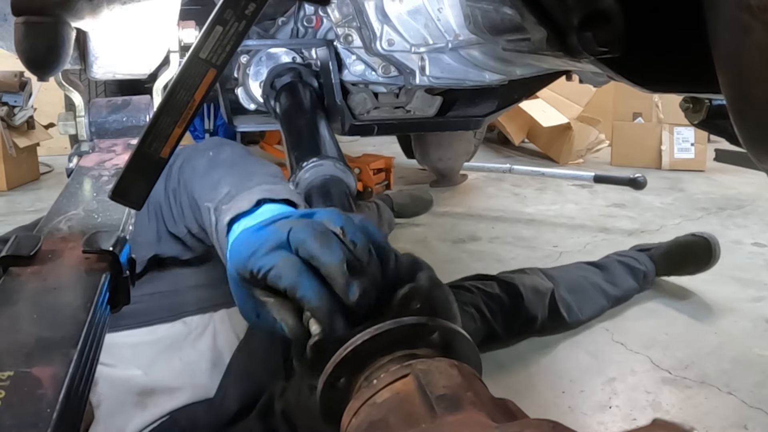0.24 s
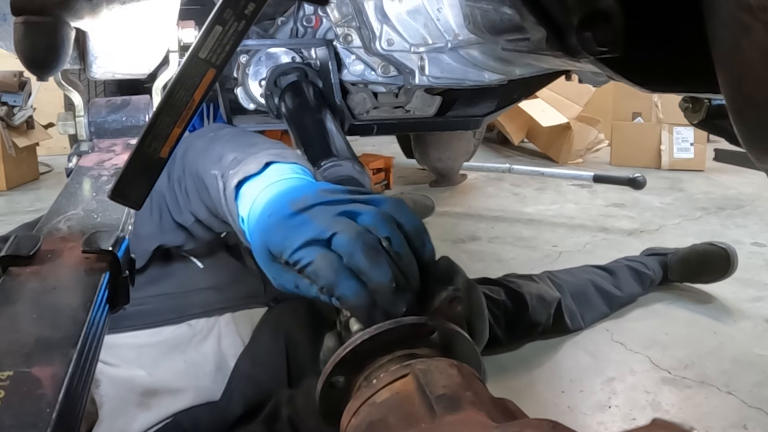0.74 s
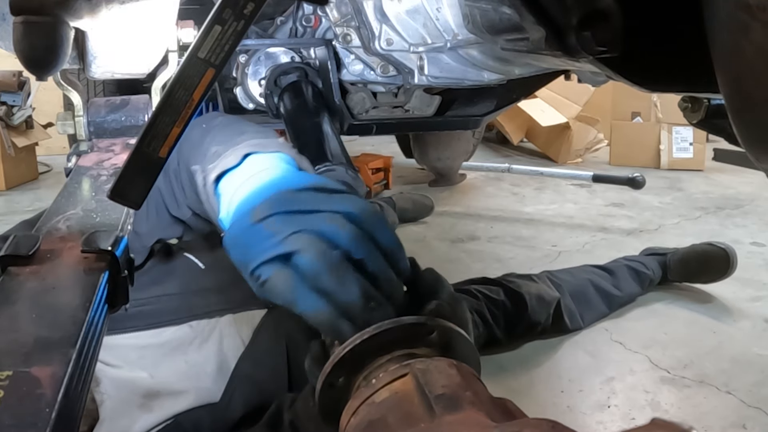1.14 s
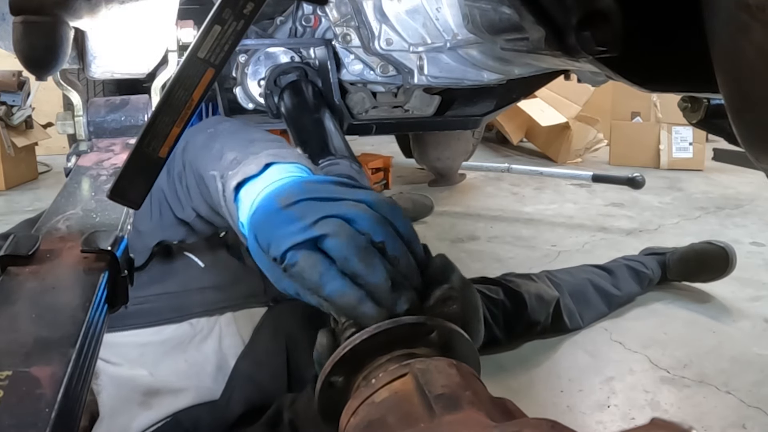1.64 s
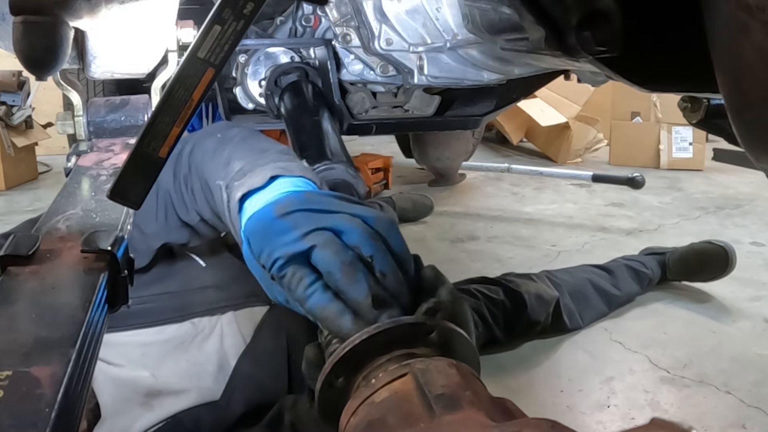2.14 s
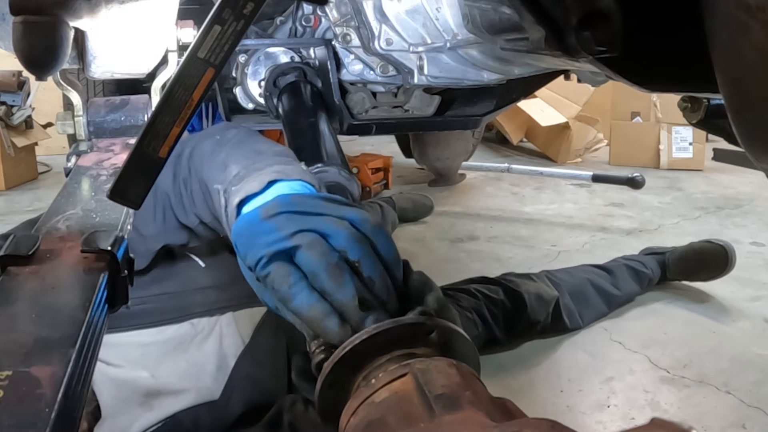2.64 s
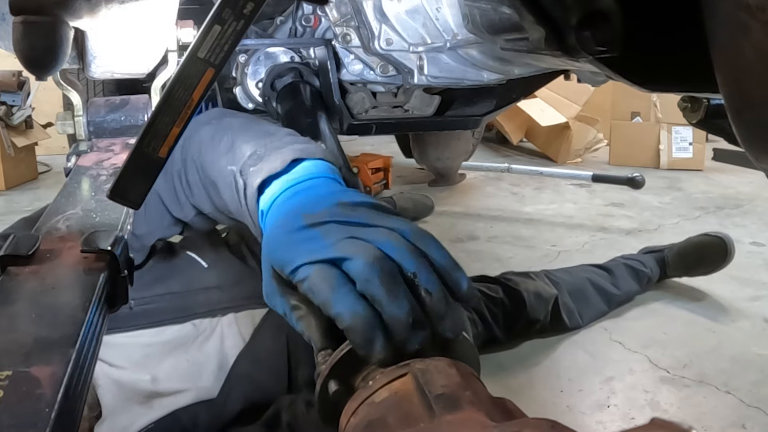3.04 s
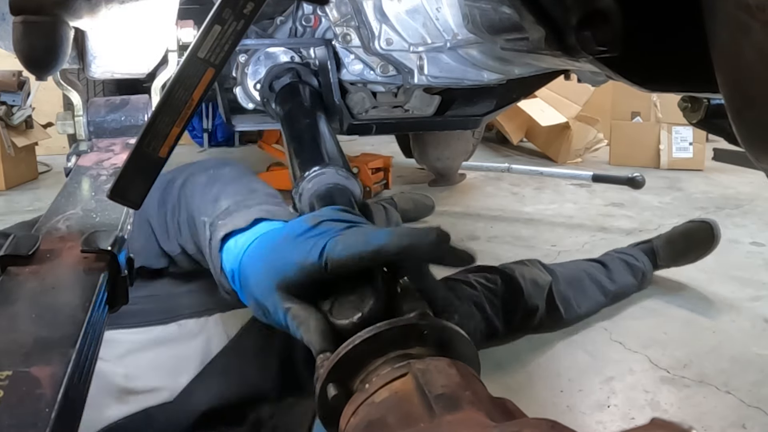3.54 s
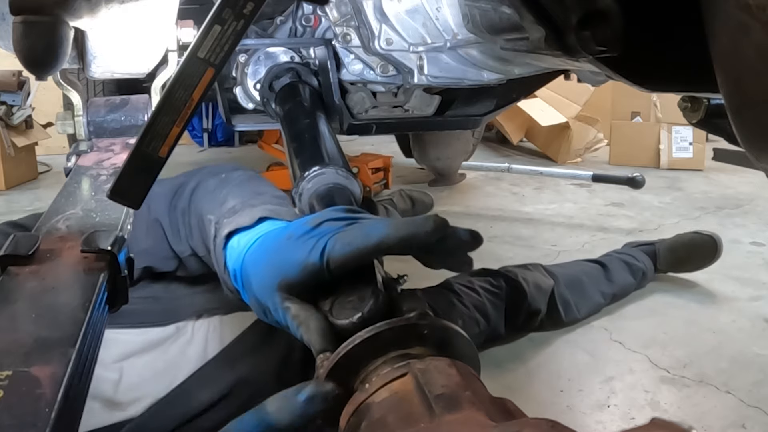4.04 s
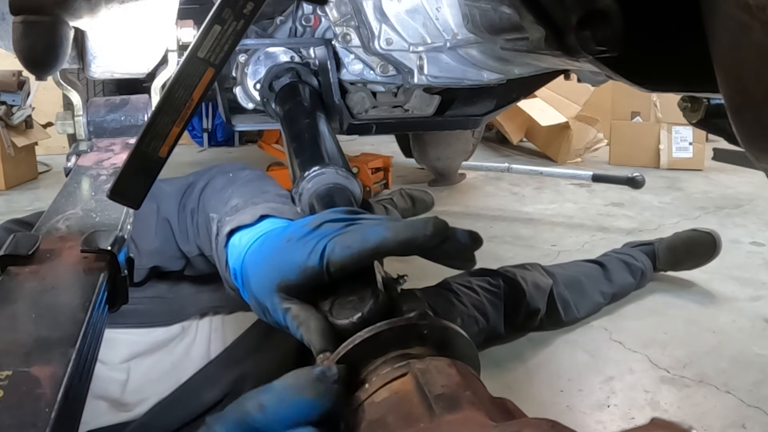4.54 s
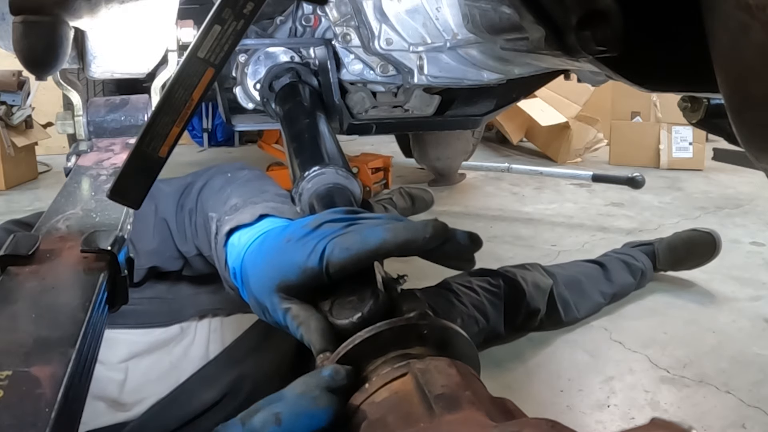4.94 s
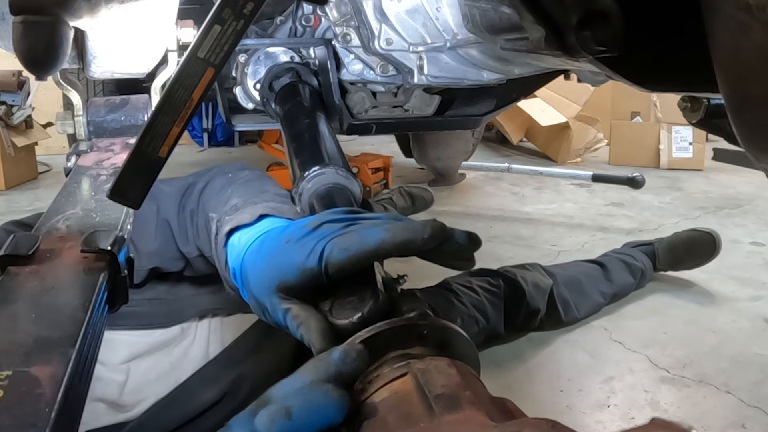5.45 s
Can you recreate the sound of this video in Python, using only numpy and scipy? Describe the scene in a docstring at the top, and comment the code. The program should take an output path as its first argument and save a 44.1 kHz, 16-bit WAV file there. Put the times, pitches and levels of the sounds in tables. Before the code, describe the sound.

A heavy metal clank with a hollow, ringing boom opens, as a driveshaft is pushed against a differential. Light bolt ticks, dull thuds and sharp clinks come at uneven intervals, building to another loud clatter about halfway. Afterwards the work turns quieter, with light clinks, brief gritty scrapes and glove scuffs. The microphone is close, over the faint low hum of a slightly echoing garage.

```python
"""Driveshaft flange against a differential

Under a car in a garage, a gloved hand works the two flanges together. The hollow shaft booms at
the start, the housing thuds, the steel flange clinks and scrapes, a loose bolt ticks. Struck parts
ring as decaying sines; noise bursts add the contact. Sleeve and glove rustle close to a small
microphone, over the quiet air of the garage."""
import sys
import numpy as np
from scipy import signal
from scipy.io import wavfile
from scipy.ndimage import uniform_filter1d

SR = 44100
rng = np.random.default_rng(int(sys.argv[2]) if len(sys.argv) > 2 else 0)


def generate_wav(sig):
    """Save sig (samples, or channels by samples) to the path in sys.argv[1] as 16-bit PCM at SR."""
    pcm = np.round(np.clip(np.atleast_2d(sig).T, -1, 1) * 32767).astype(np.int16)
    wavfile.write(sys.argv[1], SR, pcm)


N = 251348

# dull blows on the housing: start_s, level_db, centre_hz, t60_s, bite_db
HOUSING_THUDS = [(0.0, -22.5, 170, 0.43, -10), (.062, -7.5, 594, 0.12, -4), (.072, -12.5, 422, 0.067, -5),
                 (.079, -4, 308, 0.088, -15), (.087, -14, 448, 0.17, -5), (.104, -11, 675, 0.076, -7.5),
                 (.129, -14, 520, 0.21, -8), (.159, -18, 555, 0.46, -6), (1.064, -35, 302, 0.36, -25),
                 (1.362, -36.5, 292, .45, -4), (1.818, -21, 232, 0.069, -15), (1.845, -22, 466, .12, -7.5),
                 (1.94, -21, 227, 0.36, -17), (1.967, -24.5, 208, 0.13, -28), (2.343, -33, 338, 0.19, -21),
                 (2.498, -18.5, 367, 0.16, -9), (2.514, -25, 303, 0.24, -14),
                 (2.56, -26.5, 313, 0.086, -12), (2.689, -27, 292, .11, -10),
                 (2.828, -35.5, 587, 0.15, -24), (2.856, -20.5, 310, .22, -6),
                 (2.898, -20, 290, 0.65, -0.5), (2.925, -11.5, 550, 0.15, -8), (2.948, -7, 510, 0.083, -9),
                 (3.021, -29, 255, 0.21, -13), (3.058, -20, 272, 0.15, -16), (3.107, -21.5, 290, .19, -11),
                 (3.188, -17.5, 315, 0.073, -6), (3.374, -31.5, 290, 0.11, -17),
                 (3.673, -28.5, 660, 0.076, -32)]
# hard contacts: start_s, level_db, centre_hz, treble_fall_db_per_oct, ring_db
FLANGE_CLINKS = [(0.064, -8, 790, 11, -27), (.0716, -3, 1630, 19, -16), (0.0806, -4, 2240, 20, -33),
                 (1.8118, -12.5, 2780, 10.5, 1), (2.358, -32.5, 4000, 4, 1), (2.504, -24.5, 1830, 29, -4.5),
                 (2.563, -47, 1500, 20, -7), (2.8587, -23, 6040, 12, -10), (2.8959, -10.5, 3500, 10.5, 11),
                 (2.932, -11.5, 11000, 11, -29), (2.9472, -3, 2380, 26, -0.5),
                 (3.059, -29.5, 6000, 14, -17), (3.186, -27, 1810, 19, -1), (3.33, -30, 4440, 13, -25),
                 (3.519, -14, 8050, -5.5, -23), (3.539, -23, 3000, 10, -6), (3.689, -21.5, 2260, 21, -25),
                 (3.952, -19.5, 2980, 18, -23), (3.883, -24, 3970, 17, -21), (4.881, -18, 4300, 13, -26),
                 (4.936, -34, 2250, 24, -24), (5.034, -28.5, 4000, 9.5, 3), (5.156, -24, 4360, 13, 1),
                 (5.205, -21.5, 4460, 9.5, -10), (5.614, -23, 2260, 13.5, -15)]
BOLT_TICKS = [(.596, -32, 3500, 30, -16), (.679, -33.5, 2830, 13, -10), (1.0329, -22, 2500, 17, -38),
              (1.0461, -15, 2580, 22, -29), (1.05, -22, 3000, -2, -9), (1.064, -11, 2980, 19, -17),
              (1.258, -31.5, 4260, 11, -28), (1.3546, -20, 3470, 21, -10.5), (1.5288, -33, 2900, 19, -29)]
# blows that leave a part ringing freely: start_s, level_db
SHAFT_BLOWS = [(0.0, -23.5), (.066, -12), (1.066, -57), (1.36, -48), (1.82, -35), (2.35, -39)]
RIM_BLOWS = [(2.8587, -45), (2.8959, -22), (2.931, -32), (3.059, -61)]
SMALL_PART_BLOWS = [(4.935, -33), (5.204, -30), (5.604, -34), (5.613, -29.5)]
# flange faces sliding: start_s, swell_s, hold_s, level_db, grit_db, dulling_db_per_oct
FLANGE_SLIDES = [(2.003, 0.01, 0.1, -53, -20, 2.5), (2.196, 0.0074, .05, -50.5, -14, -4),
                 (2.25, 0.018, 0.026, -43.5, -25, 5.5), (2.295, 0.024, 0.049, -36, -19, 7),
                 (2.453, 0.027, 0.013, -38, -11.5, 3), (2.659, 0.013, 0.018, -44, -6.5, 3.5),
                 (2.8, 0.074, .015, -45, -18, 1), (3.038, 0.0039, .02, -47, -1, -1),
                 (4.545, 0.0072, 0.015, -31.5, -7, 35), (4.64, 0.01, 0.025, -40, 2.5, 23),
                 (4.659, 0.015, 0.027, -37.5, -0.5, 26), (4.834, 0.019, 0.035, -35.5, -3.5, 31),
                 (5.227, 0.019, 0.028, -45.5, -4, 8), (5.472, 0.053, 0.014, -43.5, -3, 8)]
# the first clank's rattling tail, then glove scuffs: middle_s, level_db, centre_hz, half_width_s
NOISE_SWELLS = [(0.199, -32, 2100, 0.099), (2.255, -46.5, 1400, 0.034), (2.342, -40.5, 1470, 0.043),
                (2.771, -42, 3900, .012), (3.464, -37, 3020, 0.031), (3.826, -34, 2600, 0.027),
                (3.983, -35.5, 2950, 0.055), (4.071, -40, 3660, 0.049), (4.458, -42.5, 3930, 0.055),
                (4.789, -46, 3780, 0.028), (4.959, -49, 2210, 0.055)]

# modes of each part: pitch_hz, level_db, t60_s
HOUSING_MODES = [(122, -5.5, 0.57), (171, -15, 0.13), (210.7, -5.5, 0.98), (300.3, -2, 0.72),
                 (370.8, -8.5, 0.75), (506.7, -3, 0.41), (588, 13, 0.055), (665, 2.5, 0.089),
                 (792, -35, 0.056), (1016, -20, 0.42), (1195, -40, .15)]
SHAFT_MODES = [(254, -4, 1.9), (312, -13, 1.4), (361, -6, 1.0), (416, -3, 1.7), (486, -8, .7),
               (511, -3, 1.4), (571, 0, .65), (599, -3, 1.2), (673, -7, .8), (710, -3, .55), (748, -3, .65),
               (969, -18, .8), (1174, -20, .8)]
FLANGE_MODES = [(1400, -16, .05), (2218, -13, .05), (2470, -13, .05), (2503, 0, .065), (5766, -22, .03),
                (6150, -21, .06), (10380, -7, .1), (13600, -10, .05)]
RIM_MODES = [(6514, -6, .05), (6966, 0, .2), (8027, -4, .06)]
BOLT_MODES = [(1863, -1, .1), (2640, -6, .1), (4170, 0, .14), (6520, -8, .08), (6900, -9, .22),
              (11090, -4, .05)]
SMALL_PART_MODES = [(2070, -2, 0.039), (2280, -2, 0.046)]

# noise spectra: freq_hz, level_db
GRIT_SPECTRUM = [(800, -11), (1400, -47), (3000, -2.5), (4700, 7.5), (6500, -8), (10000, -17), (14000, -9)]
HISS_SPECTRUM = [(300, 2.5), (800, -4.5), (1500, -3.5), (3000, -5), (6000, -14), (9000, -17.5), (14000, -7)]
AIR_SPECTRUM = [(15, -60), (25, -20), (130, 1.5), (169, 2), (219, -2.5), (284, 0.5), (454, -1.5), (536, -1),
                (4070, -34), (7000, -37), (9100, -61), (15400, -120)]
# level curves of the cloth and room hiss, and of the air: time_s, level_db
HISS_LEVELS = [(0, -31), (.22, -36), (.3, -45), (.57, -46), (.95, -60.5), (1.11, -50), (1.54, -49),
               (1.67, -59), (1.82, -47.5), (2.35, -60), (2.6, -57), (2.76, -43.5), (2.92, -41.5),
               (3.21, -45), (3.51, -36.5), (4.09, -40), (4.46, -42), (4.67, -50), (4.8, -48), (5.3, -48.5),
               (5.7, -50.5)]
AIR_LEVELS = [(0, -32), (1, -47.5), (1.701, -46), (2.5, -42.5), (3.6, -45), (4.2, -45), (4.7, -44.5),
              (5.2, -43.5), (5.7, -46)]
# faint drones in the air: centre_hz, width_hz, boost_db
AIR_DRONES = [(167.2, 15.7, 8.5), (282.4, 20, 8)]
# garage reverberation: freq_hz, t60_s
GARAGE_DECAY = [(100, 0.69), (400, 0.72), (1000, 0.65), (2500, 0.32), (10000, 0.12)]
# microphone housing with a port notch: freq_hz, gain_db
MIC_RESPONSE = [(40, -32.5), (150, -6), (6800, -3), (8300, -13.5), (9100, -22), (9700, -12), (10600, -13.5),
                (11400, -15), (12200, -36), (13300, -28)]


def housing_thud(level_db, centre_hz, t60_s, bite_db):
    """Soft blow: housing modes damped by the grip, a knock, a brighter bite, a low push."""
    t = np.arange(SR // 2) / SR
    grip = gain_of(-30 * t / abs(t60_s))
    body = ring(HOUSING_MODES, t, centre_hz, fall_db_per_oct=10.1, scatter_db=0.77) * grip
    knock = gain_of(-4) * burst(t, centre_hz, 10, 17, t60_s)
    bite = gain_of(bite_db) * burst(t, 1110, 7.5, 12.9, t60_s=0.059)
    push = gain_of(-17.5) * burst(t, 137, 18, 48, t60_s=0.39)
    rise_cycles = 1.81
    attack = 1 - np.exp(-t * centre_hz / rise_cycles)
    return gain_of(level_db + 5) * (body + knock + bite + push) * attack


def shaft_boom(level_db):
    """The hollow tube rings on after a blow."""
    t = np.arange(2 * SR) / SR
    attack = 1 - np.exp(-t / .002)
    return gain_of(level_db) * ring(SHAFT_MODES, t) * attack


def steel_clink(level_db, centre_hz, treble_db_per_oct, ring_db, *,
                modes, modes_hz, dulling_share, bass_db_per_oct, free_s):
    """Hard contact: a tick, a short crack, then the part's modes, damped after free_s."""
    t = np.arange(SR // 4) / SR
    tick = burst(t, centre_hz, bass_db_per_oct + 5, treble_db_per_oct, t60_s=0.0086)
    crack = gain_of(-8) * burst(t, centre_hz, bass_db_per_oct, treble_db_per_oct, t60_s=0.068)
    # duller blows miss the modes far from modes_hz
    ringing = gain_of(ring_db) * ring(modes, t, modes_hz, dulling_share * treble_db_per_oct)
    stop_t60_s = .03
    damping = gain_of(-60 * np.maximum(t - free_s, 0) / stop_t60_s)
    attack = 1 - np.exp(-t / .0003)
    return gain_of(level_db - 3) * (tick + crack + ringing * damping) * attack


def flange_free_s(start_s, settle_s=.02):
    """Time until a thud presses the faces together; thuds within settle_s do not count."""
    waits_s = [thud_s - start_s for thud_s, *_ in HOUSING_THUDS if thud_s > start_s + settle_s]
    return min(waits_s, default=1)


def free_ping(modes, level_db, length_s):
    """The flange rim or a small part rings briefly and freely."""
    t = np.arange(int(length_s * SR)) / SR
    return gain_of(level_db) * ring(modes, t)


def flange_slide(swell_s, hold_s, level_db, grit_db, dulling_db_per_oct):
    """Rough steel faces drag: dense uneven slips drive the flange modes, with a gritty hiss."""
    stop_s, slips_per_s, contact_t60_s = 0.037, 4000, .2
    knots_s = np.cumsum(np.abs([0, swell_s, hold_s, stop_s]))
    t = np.arange(0, knots_s[-1], 1 / SR)
    slips = (rng.random(len(t)) < slips_per_s / SR) * rng.standard_normal(len(t))
    ring_t = np.arange(3000) / SR
    flange = ring(FLANGE_MODES, ring_t, 2503, dulling_db_per_oct)
    flange *= gain_of(-60 * ring_t / contact_t60_s)
    ringing = signal.fftconvolve(slips, flange)[:len(t)]
    grit = noise(len(t), 256, lambda hz, _: curve_at(GRIT_SPECTRUM, hz))
    scrape = unit_rms(ringing) + gain_of(grit_db) * unit_rms(grit)
    envelope_db = np.interp(t, knots_s, [-15, 0, 0, -37.5])
    return gain_of(level_db + envelope_db) * scrape * signal.windows.tukey(len(t), .1)


def noise_swell(level_db, centre_hz, half_width_s):
    """Short swell of band noise: a clank's rattling tail or a glove scuff."""
    t = np.arange(-2 * half_width_s, 2 * half_width_s, 1 / SR)
    hiss = unit_rms(noise(len(t), 256, lambda hz, _: hump_db(hz, centre_hz, 17.4)))
    return gain_of(level_db) * hiss * np.exp(-(t / half_width_s) ** 2)


def cloth_and_room_hiss():
    """Patchy, flickering hiss of sleeve and glove, plus the room's hissy tail after loud clanks."""
    def field_db(hz, t):
        drift_db = 2 * patches(hz, t, span_bins=6, span_frames=24)
        flicker_db = 0.3 * unit_rms(uniform_filter1d(rng.exponential(1, len(t)) - 1, 3))
        presence_db = np.maximum(hump_db(hz, 2360, 2.4), -6)
        return curve_at(HISS_SPECTRUM, hz) + presence_db + drift_db + flicker_db
    return envelope(HISS_LEVELS) * unit_rms(noise(N, 256, field_db))


def garage_echo(dry):
    """Diffuse tail; each band decays at its own rate."""
    gap_s, rise_s = .004, .008
    tail = noise(SR, 256, lambda hz, t: -60 * t / curve_at(GARAGE_DECAY, hz))
    tail *= np.clip((np.arange(SR) / SR - gap_s) / rise_s, 0, 1)
    return signal.fftconvolve(dry, tail / np.linalg.norm(tail))[:N]


def garage_air():
    """Low, slightly patchy wash with two fuzzy drones."""
    def field_db(hz, t):
        drift_db = 1.8 * patches(hz, t, span_bins=8, span_frames=8)
        drones_db = sum(boost_db * np.exp(-((hz - centre_hz) / width_hz) ** 2)
                        for centre_hz, width_hz, boost_db in AIR_DRONES)
        return curve_at(AIR_SPECTRUM, hz) + drones_db + drift_db
    return envelope(AIR_LEVELS) * unit_rms(noise(N, 4096, field_db))


def ring(modes, t, centre_hz=1000, fall_db_per_oct=0, scatter_db=1):
    """Decaying sines, scattered in level at each blow; a fall favours modes near centre_hz."""
    hz, level_db, t60_s = np.transpose(modes)[:, :, None]
    signs = (-1) ** np.arange(len(hz))[:, None]  # neighbours start opposed
    random_db = scatter_db * rng.standard_normal(hz.shape)
    gains = gain_of(level_db + hump_db(hz, centre_hz, fall_db_per_oct) + random_db)
    sines = signs * gains * gain_of(-60 * t / abs(t60_s)) * np.sin(2 * np.pi * hz * t)
    return sines.sum(0) / np.linalg.norm(gains)


def burst(t, centre_hz, bass_db_per_oct, treble_db_per_oct, t60_s):
    """Decaying band noise, scaled to the energy of its envelope."""
    def field_db(hz, _):
        return hump_db(hz, centre_hz, np.where(hz < centre_hz, bass_db_per_oct, treble_db_per_oct))
    fade = gain_of(-60 * t / abs(t60_s))
    x = noise(len(t), 512, field_db) * fade
    return x * np.linalg.norm(fade) / np.linalg.norm(x)


def noise(size, frame, field_db):
    """Noise from random short-time spectra shaped by field_db(hz, t)."""
    hz = np.fft.rfftfreq(frame, 1 / SR)[:, None]
    t = np.arange(4 * size // frame + 5) * frame / 4 / SR
    real, imag = rng.standard_normal((len(t), len(hz), 2)).T
    spectra = (real + 1j * imag) * gain_of(field_db(hz, t))
    return signal.istft(spectra, nperseg=frame, noverlap=frame - frame // 4)[1][:size]


def patches(hz, t, span_bins, span_frames):
    """Smooth random field over frequency and time, rms 1."""
    field = rng.standard_normal((len(t), len(hz))).T
    return unit_rms(uniform_filter1d(uniform_filter1d(field, span_bins, 0), span_frames, 1))


def hump_db(hz, centre_hz, fall_db_per_oct):
    """Falls away on both sides of a centre."""
    return -fall_db_per_oct * abs(np.log2((hz + 1) / centre_hz))


def curve_at(points, hz):
    """Interpolates a table over log frequency."""
    points_hz, values = np.transpose(points)
    return np.interp(np.log(hz + 1), np.log(points_hz + 1), values)


def envelope(levels):
    """Level curve to gain per sample."""
    return gain_of(np.interp(np.arange(N) / SR, *np.transpose(levels)))


def gain_of(db):
    """Decibels to amplitude."""
    return 10 ** (np.asarray(db) / 20)


def unit_rms(x):
    """Scales to rms 1."""
    return x / np.sqrt(np.mean(x ** 2) + 1e-20)


def add(mix, start_s, sound):
    """Mixes a sound in at start_s."""
    part = mix[max(round(start_s * SR), 0):][:len(sound)]
    part += sound[:len(part)]


def scene():
    """Blows, slides and swells with their echo, plus shaft, hiss and air."""
    contacts, shaft = np.zeros((2, N))
    for start_s, *thud in HOUSING_THUDS:
        add(contacts, start_s, housing_thud(*thud))
    for start_s, level_db in SHAFT_BLOWS:
        add(shaft, start_s, shaft_boom(level_db))
    for start_s, *clink in FLANGE_CLINKS:
        add(contacts, start_s, steel_clink(*clink, modes=FLANGE_MODES, modes_hz=1700, dulling_share=.4,
                                           bass_db_per_oct=6.6, free_s=flange_free_s(start_s)))
    for start_s, *tick in BOLT_TICKS:
        add(contacts, start_s, steel_clink(*tick, modes=BOLT_MODES, modes_hz=3300, dulling_share=.082,
                                           bass_db_per_oct=10.3, free_s=1))
    for start_s, level_db in RIM_BLOWS:
        add(contacts, start_s, free_ping(RIM_MODES, level_db, length_s=.25))
    for start_s, level_db in SMALL_PART_BLOWS:
        add(contacts, start_s, free_ping(SMALL_PART_MODES, level_db, length_s=.1))
    for start_s, *slide in FLANGE_SLIDES:
        add(contacts, start_s, flange_slide(*slide))
    for middle_s, level_db, centre_hz, half_width_s in NOISE_SWELLS:
        add(contacts, middle_s - 2 * half_width_s, noise_swell(level_db, centre_hz, half_width_s))
    echo = gain_of(-16) * garage_echo(contacts)
    return (contacts + echo + shaft + cloth_and_room_hiss() + garage_air())[None]


def record(dry):
    """Microphone colour, then the band limit."""
    hz = np.linspace(0, SR / 2, 1025)
    squared_gain = gain_of(2 * curve_at(MIC_RESPONSE, hz))  # minimum_phase takes the root
    colour = signal.minimum_phase(signal.firwin2(1023, hz, squared_gain, fs=SR))
    heard = signal.oaconvolve(dry, colour[None])[:, :N]
    cutoff_hz = 13950
    lowpass = signal.firwin(511, cutoff_hz, window=("kaiser", 9), fs=SR)
    return signal.oaconvolve(heard, lowpass[None], "same")


dry = scene()
out = record(dry)
generate_wav(out)
```